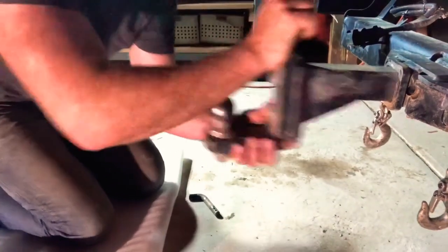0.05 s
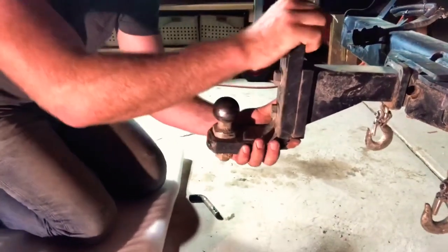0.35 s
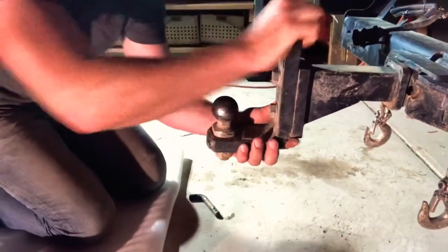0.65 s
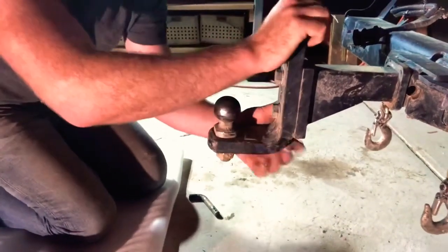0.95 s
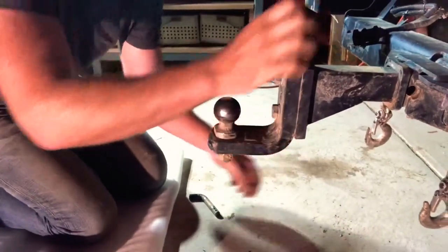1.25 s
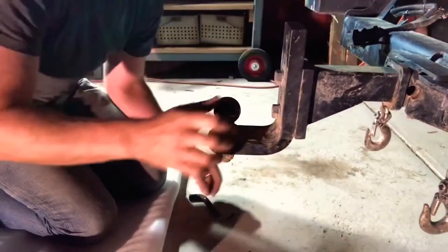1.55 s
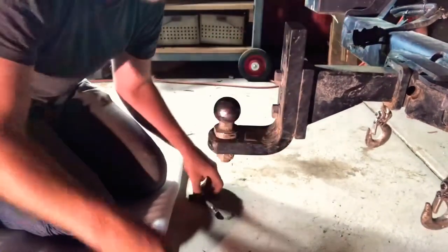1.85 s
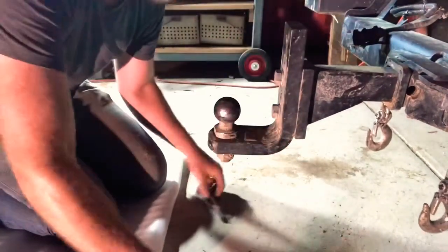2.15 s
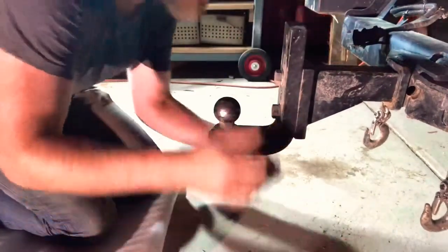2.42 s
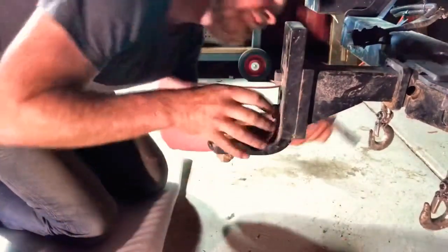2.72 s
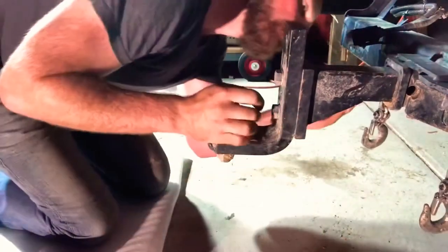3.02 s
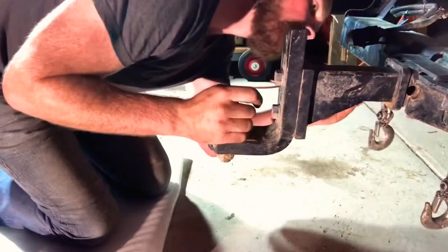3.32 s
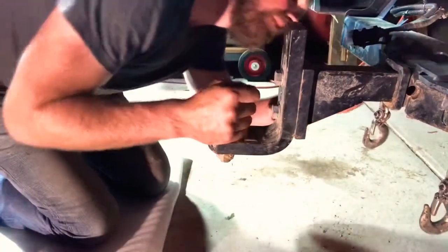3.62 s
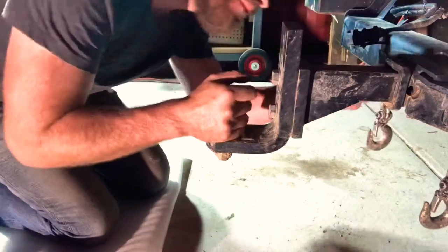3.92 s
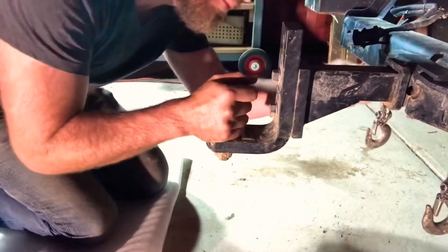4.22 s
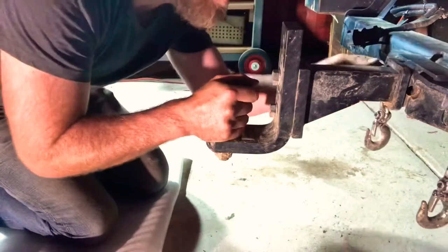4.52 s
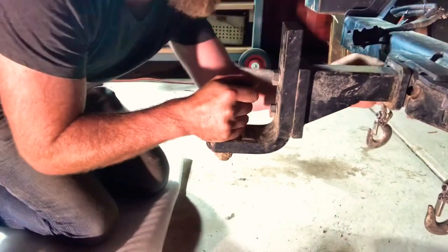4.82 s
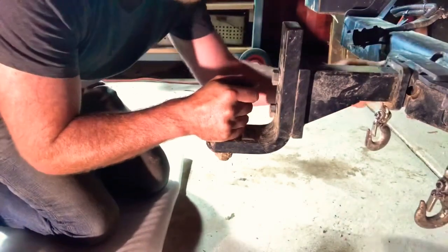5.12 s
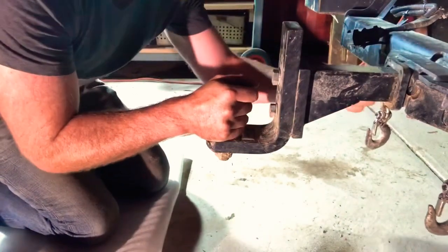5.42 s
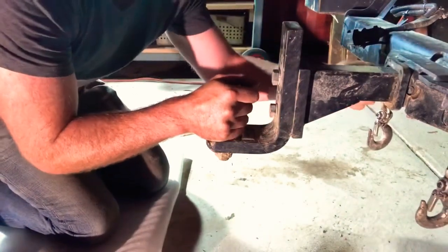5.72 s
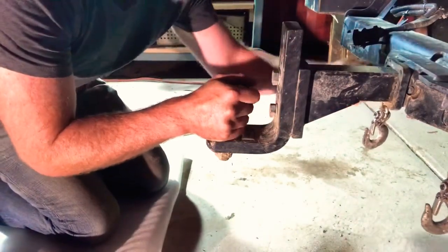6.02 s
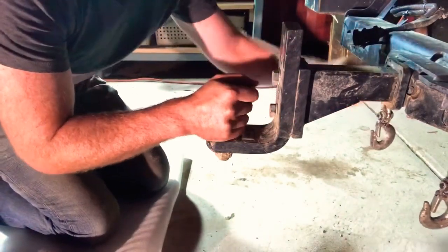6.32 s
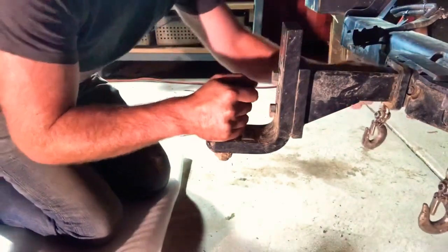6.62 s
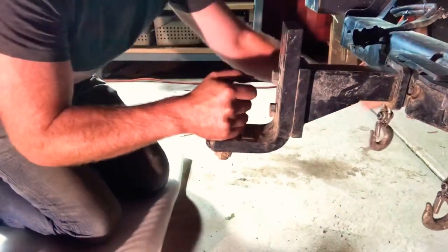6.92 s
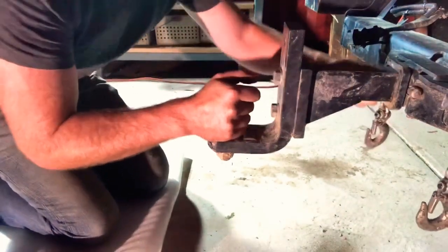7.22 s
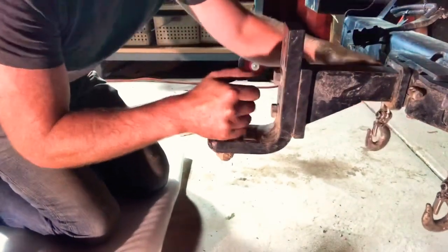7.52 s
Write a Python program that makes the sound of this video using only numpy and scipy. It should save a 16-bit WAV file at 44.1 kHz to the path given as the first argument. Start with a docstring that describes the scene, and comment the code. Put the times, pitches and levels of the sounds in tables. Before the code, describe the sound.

A steel hitch mount thuds into place, then its locking pin clanks irregularly and squeaks once in a reverberant garage.

```python
"""A steel tow mount is shoved into a vehicle's receiver tube and jiggled about in a garage.
Friction on rusty steel makes it scrape; impacts excite the normal modes of the steel, which clanks,
and of the frame, which thuds. The locking pin rings faintly, clanks while it seeks its hole and squeaks
once by stick-slip. There is one long, soft rustle. The garage reverberates, and far insects,
probably katydids, rasp in chorus over the quiet room."""
import sys
import numpy as np
from scipy import signal
from scipy.fft import rfft, irfft, next_fast_len
from scipy.io import wavfile
from scipy.ndimage import uniform_filter1d

SR = 44100
rng = np.random.default_rng(int(sys.argv[2]) if len(sys.argv) > 2 else 0)


def transcribe(signal):
    """Save signal, clipped to [-1, 1], as a 16-bit WAV file at the path in sys.argv[1]."""
    frames = np.atleast_2d(signal).T
    limited = np.clip(frames, -1, 1)
    pcm = np.round(limited * 32767).astype(np.int16)
    wavfile.write(sys.argv[1], SR, pcm)


N = 337715
TIME = np.arange(N) / SR
EDGES = 30 * 2 ** (np.arange(29) / 3)   # third-octave band edges, f/Hz
CENTRES = np.sqrt(EDGES[1:] * EDGES[:-1])

# normal modes of mount and receiver tube: f/Hz, relative level/dB, T60/s
STEEL_MODES = [(414, -11, 0.18), (577.5, -15.5, 0.29), (845, -22, 0.74), (870, -16.5, 0.61),
               (970, -7, 0.12), (1415, -11.5, 0.16), (1623, -10.5, 0.24), (1983, 1, 0.07),
               (2250, -36.5, 0.17), (2354, -7.5, 0.095), (2396, -18.5, 0.1), (2900, -16.5, 0.088),
               (2970, -23, 0.16), (3094, -4, 0.073), (3080, -12, 0.19), (3393, -9, 0.2), (3477, -10, 0.18),
               (4006, -5.5, 0.076), (4300, -12, 0.12), (4335, -7.5, 0.092), (5200, -17.5, 0.19),
               (5360, -28, 0.12), (6080, -13.5, 0.11), (5930, -8, 0.13), (7070, -16.5, 0.11),
               (7690, -6.5, 0.07), (12400, -5, .12)]
# the shank scrapes along the tube and bumps home: bump t/s, lead of the scrape/s, scrape level/dB,
# relative treble/dB, clank level/dB, thud level/dB, relative boom/dB
SHOVES = [(0.140, 0.043, -22.5, -12.5, -17.5, -11, -5.5), (0.497, 0.049, -40, -4.5, -52, -32.5, 4),
          (0.748, 0.044, -39, -10, -38, -20, -6), (3.953, 0.094, -41, -2, -47, -45.5, 11),
          (6.603, 0.026, -40, -36.5, -27, -27, -14.5), (7.177, 0.03, -28.5, -18.5, -19, -20.5, -1)]


def from_db(db):
    """Amplitude ratio for a level in decibels."""
    return 10 ** (np.asarray(db) / 20)


def at_hz(points, hz):
    """Interpolation of a table on a logarithmic frequency axis."""
    table_hz, values = np.transpose(points)
    return np.interp(np.log(hz), np.log(table_hz), values)


def shelf(hz, corner_hz):
    """High-pass weighting: 0 far below the corner, 1 far above."""
    return 1 / (1 + (corner_hz / hz) ** 4)


def noise_bands(size, uneven_db=0, spacing_hz=110):
    """Third-octave noise bands, neighbours uncorrelated; spectral ripple stands for crowded modes."""
    length = next_fast_len(size)
    white = rfft(rng.standard_normal((2, length)))
    hz = np.arange(white.shape[1]) * SR / length
    ripple = from_db(uneven_db * np.interp(hz / spacing_hz, np.arange(600), rng.uniform(-1, 1, 600)))
    noise = irfft(white * ripple / np.sqrt(np.mean(ripple ** 2)), length)[:, :size]
    filters = [signal.butter(2, pair, "band", fs=SR, output="sos") for pair in zip(EDGES, EDGES[1:])]
    return np.array([signal.sosfilt(sos, noise[k % 2]) for k, sos in enumerate(filters)])


def band_gains(spectrum):
    """Band gains for a spectrum, normalised so that the band powers add to 1."""
    gains = from_db(at_hz(spectrum, CENTRES))
    return gains / np.sqrt(np.sum(gains ** 2 * np.diff(EDGES)) * 2 / SR)


def clicks(times, sizes):
    """Impulsive excitation: one impulse per contact."""
    return np.bincount(np.clip(np.round(times * SR).astype(int), 0, N - 1), sizes, N) + 1e-18


def ring(drive, hz, t60):
    """Damped oscillator: a unit impulse starts a decaying sine of amplitude 1."""
    r, w = from_db(-60 / (t60 * SR)), 2 * np.pi * hz / SR
    return signal.lfilter([0, np.sin(w)], [1, -2 * r * np.cos(w), r * r], drive)


def fade(energy, t60):
    """Damping: stored energy decays exponentially, by 60 dB in t60 seconds."""
    return signal.lfilter([1], [1, -from_db(-120 / (t60 * SR))], energy)


def struck_modes(times, levels_db, modes, t60_scale, detune):
    """Modal superposition: each blow rings the same modes, detuned and damped by the contact."""
    hz, mode_db, t60 = np.transpose(modes)[:, :, None]
    t, out = TIME[:SR // 4], np.zeros(N + SR)
    shifts = 1 + detune * rng.standard_normal((len(times), len(modes), 1))
    for s, db, scale, shift in zip(times, levels_db, t60_scale, shifts):
        start = round(s * SR)
        envelopes = from_db(db[:, None] + mode_db - 60 * t / (t60 * scale))
        rings = envelopes * np.sin(2 * np.pi * hz * shift * t)
        out[start:start + len(t)] += (-1) ** np.arange(len(modes)) @ rings
    return out[:N]


def room_air(bands, level_db=-54):
    """Ambient noise: the still room has a steady spectrum, strongest in the bass."""
    # background spectrum: f/Hz, relative density/dB
    spectrum = [(25, -15.5), (55, -2.5), (90, 2.5), (170, -2.5), (285, -9.5), (500, -8.5), (900, -6),
                (1600, -8), (2300, -14), (3800, -19), (5700, -22.5), (8000, -33), (10000, -33),
                (16000, -40.5)]
    return from_db(level_db) * (band_gains(spectrum) @ bands)


def katydids(first_s=0.043, period_s=0.27, drag_s=0.007, rise_s=0.057, fall_s=0.095, gain_db=-2):
    """Stridulation: distant insects rasp in step through the resonances of their wings."""
    # wing resonances: f/Hz, bandwidth/Hz, relative level/dB
    wings = [(2850, 640, 6), (3670, 1800, -4), (4400, 380, 3), (5480, 1000, 0), (6600, 1500, -12),
             (8270, 920, -11)]
    # contour of the chorus: t/s, relative level/dB
    chorus = [(0, -54), (1.5, -54), (1.8, -50.5), (3.1, -51), (3.5, -64.5), (4.2, -55), (6.2, -60),
              (7.2, -52)]
    rasp = np.zeros(N)
    for hz, width, db in wings:
        wing = signal.butter(2, [hz - width / 2, hz + width / 2], "band", fs=SR, output="sos")
        rasp += from_db(db) * signal.sosfilt(wing, rng.standard_normal(N))
    beat = np.arange(22)
    swells = first_s + period_s * beat + drag_s * beat ** 2 / 2   # each period is drag_s longer
    sizes = from_db(np.interp(swells, *np.transpose(chorus)))
    energy = sum(size ** 2 * np.exp(-((TIME - s) / np.where(TIME < s, rise_s, fall_s)) ** 2)
                 for s, size in zip(swells, sizes))
    return from_db(gain_db) * np.sqrt(energy) * rasp / rasp.std()


def scrapes_and_rustle(bands, shove_s=0.128, grains_per_s=900, grain_db=3.0, grain_t60=0.059,
                       ring_db=-52):
    """Friction noise: rusty scrapes, light rubs and a rustle are a grainy hiss that rings the steel."""
    # light rubs and one long, soft rustle: start t/s, duration/s, level/dB, relative treble/dB
    rubs_and_rustle = [(0.373, 0.073, -45.5, 5.5), (1.06, 0.058, -56, 7), (3.46, 0.15, -52.5, -2),
                       (4.504, 0.079, -48, -8), (4.857, 0.93, -46, -12), (6.274, 0.16, -50.5, -14),
                       (6.755, 0.034, -58.5, 6.5), (7.448, 0.071, -50, 0.5)]
    # spectrum of the hiss: f/Hz, relative density/dB
    spectrum = [(50, -8), (300, 8.5), (900, 5), (2000, 5), (3500, 5.5), (7000, 2), (10000, -2), (14000, -5),
                (16000, -25)]
    onsets = rng.random(N) < grains_per_s / SR
    grains = onsets * from_db(grain_db * np.minimum(rng.exponential(1, N), 4))
    grain_energy = fade(grains ** 2 + 1e-18, grain_t60)
    grit = np.sqrt(grain_energy / grain_energy.mean())
    scrapes = [(s - lead, shove_s, db, treble) for s, lead, db, treble, *_ in SHOVES]
    body, bright = np.zeros(N), np.zeros(N)
    for start, length, db, treble in scrapes + rubs_and_rustle:
        envelope = np.interp(TIME, start + length * np.array([0, .3, .6, 1]), [0, 1, 1, 0])
        body += from_db(db) * envelope
        bright += from_db(db + treble) * envelope
    gains, high = band_gains(spectrum), shelf(CENTRES, 3200)
    hiss = grit * (body * ((gains * (1 - high)) @ bands) + bright * ((gains * high) @ bands))
    ringing = sum(from_db(db) * ring(hiss, hz, t60) for hz, db, t60 in STEEL_MODES)
    return hiss + from_db(ring_db) * ringing


def garage(sound, build_s=0.0095):
    """Reverberation: diffuse reflections build up, then decay exponentially, the treble first."""
    # reverberation time: f/Hz, T60/s
    decay_times = [(60, 1.0), (300, 1), (1000, 0.72), (3000, 0.75), (6000, 0.52), (14000, 0.36)]
    # reverberant field relative to the direct sound: f/Hz, level/dB
    levels = [(60, -12), (300, -12.5), (1000, -18.5), (1800, -14.5), (3000, -12), (6000, -12.5),
              (14000, -14)]
    t = TIME[:SR]
    t60 = at_hz(decay_times, CENTRES)[:, None]
    tails = noise_bands(SR) * from_db(-60 * t / t60) * np.sqrt(np.log(1e6) / (t60 * SR))
    response = from_db(at_hz(levels, CENTRES)) @ tails * (1 - np.exp(-t / build_s))
    return signal.fftconvolve(sound, response)[:N]


def snaps(contacts, gain_db=-1, contact_hz=2300):
    """Acceleration noise: the sudden stop of the steel radiates a sharp pressure pulse."""
    s, db = np.transpose(contacts)[:2]
    return ring(clicks(s, from_db(db + gain_db)), contact_hz, t60=.002)


def clanks(bands, contacts, dense_db=-3.5, modes_db=-10.5, bending_db=-2.5, crack=0.23, crack_t60=0.052,
           body_db=5, treble_db=5, scatter_db=2.5, slip_db=-13, detune=0.00753):
    """Impact excitation: steel cracks, its dense modes ring as noise and its strong ones as tones."""
    # spectrum of the dense steel modes: f/Hz, relative density/dB
    spectrum = [(60, -31.5), (130, -11), (220, -7.5), (400, -3.5), (650, -1), (1000, 8), (1350, -3),
                (2000, 2), (3200, -1.5), (4700, -4), (6000, 1), (7200, 0.5), (9000, -8.5), (13000, 4.5),
                (16000, -35.5)]
    # their decay: f/Hz, T60/s
    decay_times = [(200, 0.047), (1000, 0.18), (3000, 0.12), (6000, 0.11), (14000, 0.064)]
    # bending modes of the mount: f/Hz, relative level/dB, T60/s before scaling for friction
    bending_modes = [(1804, 2, .2), (1953, -6, .2), (1835, -9, .12)]
    s, db, body, treble, bend = np.transpose(contacts)

    def strength_db(hz):
        """Excitation spectrum: heavy contacts carry more body, hard ones more treble."""
        return db + (body + body_db) * (1 - shelf(hz, 1575)) + (treble + treble_db) * shelf(hz, 5500)

    out = np.zeros(N)
    for hz, gain, band in zip(CENTRES, band_gains(spectrum), bands):
        supplied = clicks(s, from_db(strength_db(hz)) ** 2)
        energy = fade(supplied, at_hz(decay_times, hz)) + crack * fade(supplied, crack_t60)
        out += from_db(dense_db) * gain * band * np.sqrt(energy)
    # the point of contact favours different modes each time
    mode_hz = np.array(STEEL_MODES)[:, :1]
    shares_db = strength_db(mode_hz).T + scatter_db * rng.standard_normal((len(s), len(mode_hz)))
    out += struck_modes(s, shares_db + modes_db, STEEL_MODES, np.ones(len(s)), detune)
    # a blow across the shank bends it; a wide swing rubs in the tube and dies sooner
    flex_db = db + bend + bending_db
    t60_scale = 1.31 / (1 + from_db(flex_db - slip_db))
    return out + struck_modes(s, flex_db[:, None], bending_modes, t60_scale, detune / 2)


def bumps(gap_s=0.016, loss_db=2.5, deepen_db=1, body_db=-3.5, treble_db=2.5, bend_db=-17.5):
    """Rocking: a shove ends in three bumps, each weaker but deeper; gives rows for clanks and thuds."""
    steel, frame = [], []
    for s, _, _, treble, clank_db, thud_db, boom in SHOVES:
        for k in range(3):
            when, loss = s + k * gap_s, k * loss_db
            steel.append((when, clank_db - loss, body_db, treble + treble_db, bend_db))
            frame.append((when, thud_db - loss, boom + k * deepen_db))
    return steel, frame


def thuds(bands, blows, dense_db=-3, modes_db=-7, swell_s=0.0015, knock_boom_db=-24):
    """Structure-borne sound: soft, heavy blows excite the low modes of the vehicle's frame."""
    # dull knocks passed to the frame while the pin is worked: t/s, level/dB
    knocks = [(4.653, -33.5), (4.768, -25.5), (5.121, -33), (5.224, -43), (5.508, -32.5), (7.029, -39.5)]
    # strong frame modes: f/Hz, relative level/dB, T60/s
    modes = [(60.3, 1, 0.27), (65.6, -6.5, 0.38), (90.3, 1, 0.22), (105.1, -10.5, 0.87), (140.4, 2.5, 0.54),
             (208.5, 1, 0.1), (276, -3.5, 0.55), (294.7, -10.5, 0.1), (401.2, 2.5, 0.32),
             (461, -2.5, 0.047), (501, -16, 0.42), (630.6, -6.5, 0.15)]
    # spectrum of the dense frame modes: f/Hz, relative density/dB
    spectrum = [(35, -31.5), (55, -15.5), (90, 8), (180, -4.5), (300, -4.5), (450, -4), (700, -17.5),
                (1200, -27.5), (3000, -43), (16000, -92)]
    # their decay: f/Hz, T60/s
    decay_times = [(60, 0.57), (150, 0.5), (400, 0.31), (1500, 0.5)]
    s, db, boom = np.transpose(blows + [(when, level, knock_boom_db) for when, level in knocks])
    out, soft = np.zeros(N), np.exp(-1 / (swell_s * SR))

    def strength(hz):
        """Excitation spectrum: square blows reach the lowest modes."""
        return from_db(db + boom * (1 - shelf(hz, 130)))

    for hz, gain, band in zip(CENTRES, band_gains(spectrum), bands):
        supplied = signal.lfilter([1 - soft], [1, -soft], clicks(s, strength(hz) ** 2))
        out += from_db(dense_db) * gain * band * np.sqrt(fade(supplied, at_hz(decay_times, hz)))
    for k, (hz, mode_db, t60) in enumerate(modes):
        out += (-1) ** k * from_db(modes_db + mode_db) * ring(clicks(s, strength(hz)), hz, t60)
    return out


def ticks(bands, t60=0.08):
    """Light impacts: small hardware radiates bright, quickly damped bursts of noise."""
    # contacts of small parts: t/s, level/dB
    touches = [(0.413, -53), (1.026, -41), (2.845, -60), (2.923, -60), (3.356, -45.5)]
    # tick spectrum: f/Hz, relative density/dB
    spectrum = [(100, -38.5), (1500, -3.5), (4000, -4.5), (6500, 3), (11000, -3.5), (16000, -8)]
    s, db = np.transpose(touches)
    return band_gains(spectrum) @ bands * np.sqrt(fade(clicks(s, from_db(db) ** 2), t60))


def pin_ring(t60=0.24, pivot_hz=5700):
    """Damped oscillation: a faint, squeaky metallic ring on three harmonics of about 1890 Hz."""
    # harmonics 2, 3 and 5: f/Hz, relative level/dB
    harmonics = [(3806, -13.5), (5690, -2.5), (9410, -22)]
    # the pin is picked up and offered to its hole: t/s, level/dB, tilt/(dB per octave)
    touches = [(2.171, -46.5, 1), (2.225, -50, 11), (2.256, -52, -21), (3.232, -43, 8)]
    s, db, tilt = np.transpose(touches)
    return sum(ring(clicks(s, from_db(db + harmonic_db + tilt * np.log2(hz / pivot_hz))), hz, t60)
               for hz, harmonic_db in harmonics)


def pin_squeak(attack_s=0.0026, t60=0.04, octave_db=-2, waver_hz=90, flutter_db=3, ring_db=-55):
    """Stick-slip: the pin gives a shrill, unsteady tone that gains its octave when pressed hard."""
    # the pin catches, then slips twice in its hole: peak t/s, f/Hz, level/dB
    slips = [(6.935, 6200, -46), (6.962, 5870, -15.5), (6.9738, 6045, -15.5)]
    # pin modes that the squeak leaves ringing: f/Hz, T60/s
    modes = [(5982, 0.15), (6176, 0.27)]
    s, hz, db = np.transpose(slips)
    slow = uniform_filter1d(uniform_filter1d(rng.standard_normal((2, N)), size=40), size=40)
    waver, flutter = slow / slow.std()
    phase = 2 * np.pi * np.cumsum(np.interp(TIME, s, hz) + waver_hz * waver) / SR
    age = TIME - s[:, None]
    envelopes = np.exp(-(np.minimum(age, 0) / attack_s) ** 2 - np.log(1000) * np.maximum(age, 0) / t60)
    level = from_db(db) @ envelopes * from_db(flutter_db * np.tanh(flutter)) + 1e-18
    pressed = np.tanh(3 * level / level.max())
    tone = level * (np.sin(phase) + from_db(octave_db) * pressed * np.sin(2 * phase))
    return tone + from_db(ring_db) * sum(ring(tone, *mode) for mode in modes)


def scene():
    """Superposition: the work at the hitch, its reverberation, the insects and the still air add."""
    # steel strikes steel: t/s, level/dB, relative body/dB, relative treble/dB, relative bending/dB
    strikes = [(0.1258, -13.5, -16, -24, 2.5), (0.1418, -17, -7, -10, 1), (0.7365, -26, -10, -11, -14),
               (0.803, -29, -13, -8, -18), (3.2311, -25, -19.5, -35, -11.5),
               (3.2923, -19.5, -24, -31.5, -31), (3.518, -36.5, -26, -22, -11),
               (3.54, -33.5, -25, -29, -18), (3.9315, -22.5, -5.5, -68, -17), (3.9705, -24, -40, -27, -37),
               (4.3645, -37, -10, -77, -18), (4.6228, -24.5, -15, -32, -22),
               (4.6491, -10.5, -28.5, -45, -28), (4.7514, -17, -24, -41, -18),
               (4.7652, -8, -24, -33.5, -32), (5.1169, -17.5, -12, -40, -26),
               (5.2233, -9.5, -10.5, -29, -29), (5.3664, -26, -38, -47, -0.5),
               (5.3762, -10.5, -20.5, -45, -15.5), (5.5086, -6, -18, -8.5, -29),
               (5.616, -27.5, -6, -37, -11), (5.7442, -17, -19.5, -41, -11.5),
               (5.8224, -19, -14.5, -59, -19), (5.986, -24.5, -12, -41, -10.5),
               (6.2131, -30.5, -8.5, -47, -12.5), (6.4062, -42, -0.5, -53, -8), (6.5442, -33, -9, -46, -10),
               (6.5664, -30.5, -1, -38, -27), (6.6823, -28, -6, -29.5, -25.5), (6.8716, -21, -21, -57, -18),
               (7.1639, -18.5, -17, -17, -27), (7.2314, -15.5, -34, -35, -22),
               (7.4766, -40.5, -33, -22, -2.5)]
    struck = noise_bands(N, uneven_db=5, spacing_hz=90)
    rubbed = noise_bands(N, uneven_db=5, spacing_hz=130)
    plain = noise_bands(N)
    steel_bumps, frame_bumps = bumps()
    contacts = strikes + steel_bumps
    impacts = snaps(contacts) + clanks(struck, contacts) + thuds(plain, frame_bumps) + ticks(struck)
    work = impacts + scrapes_and_rustle(rubbed) + pin_ring() + pin_squeak()
    return (work + garage(work) + katydids() + room_air(plain))[None]


def record(dry, rumble_hz=42, cutoff_hz=16000):
    """Band limiting and saturation: the microphone drops deep bass, rounds peaks and cuts the top."""
    high_pass = signal.butter(6, rumble_hz, "high", fs=SR, output="sos")
    low_pass = signal.ellip(10, .1, 80, cutoff_hz, fs=SR, output="sos")
    rounded = np.tanh(signal.sosfilt(high_pass, dry))
    return signal.sosfilt(low_pass, rounded)


dry = scene()
out = record(dry)
transcribe(out)
```